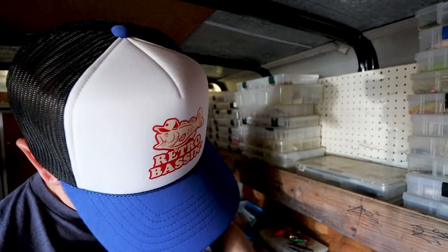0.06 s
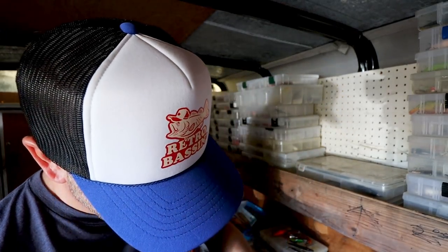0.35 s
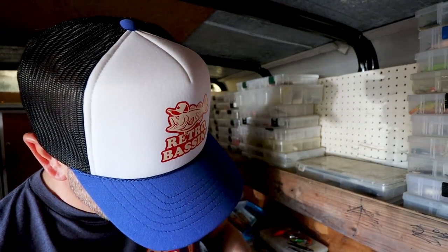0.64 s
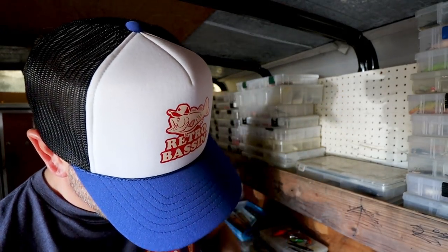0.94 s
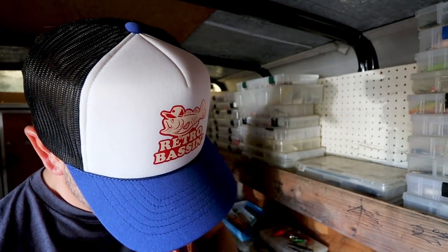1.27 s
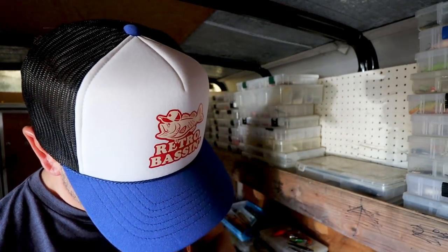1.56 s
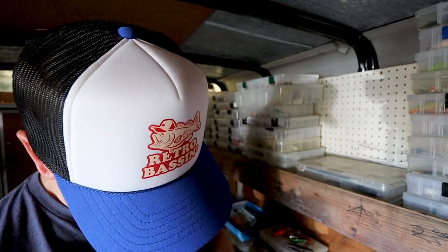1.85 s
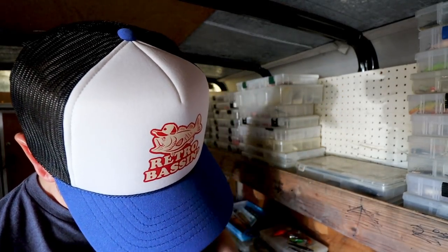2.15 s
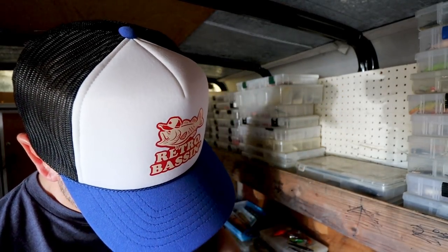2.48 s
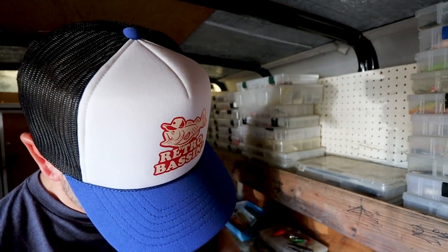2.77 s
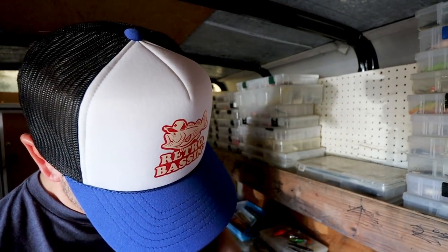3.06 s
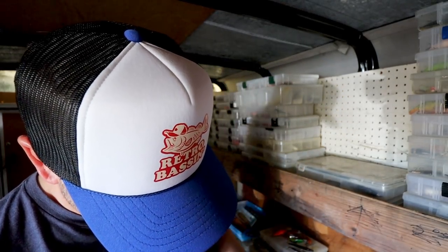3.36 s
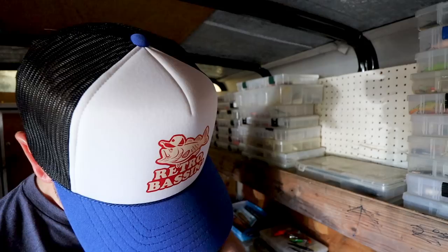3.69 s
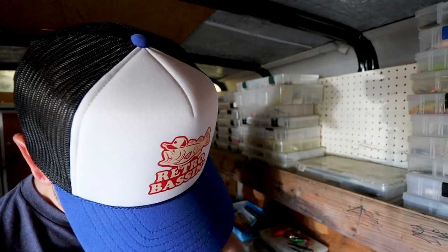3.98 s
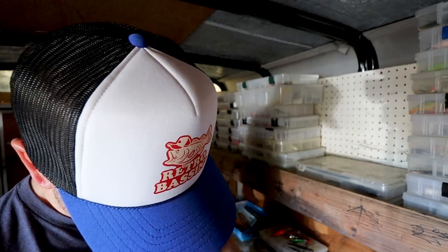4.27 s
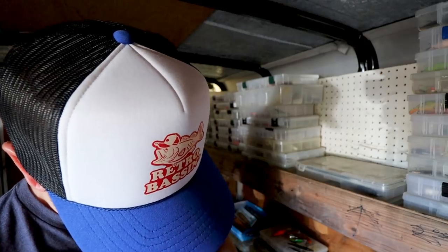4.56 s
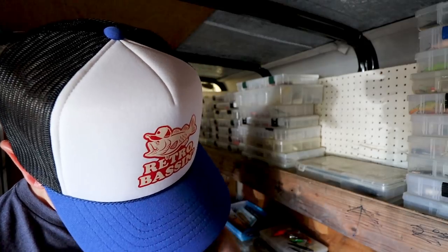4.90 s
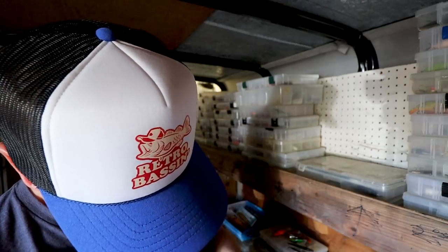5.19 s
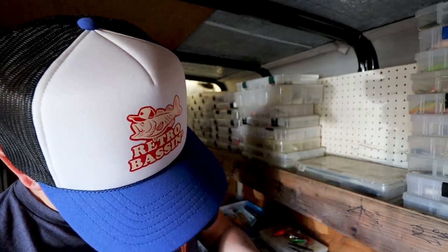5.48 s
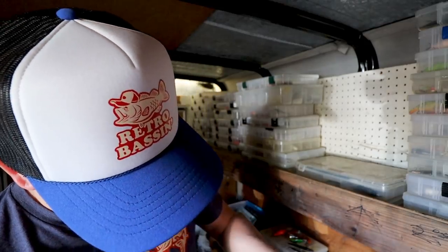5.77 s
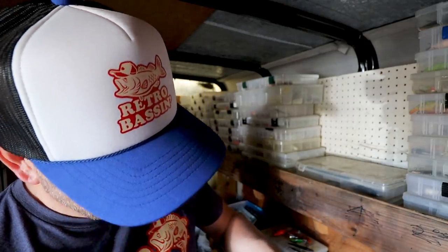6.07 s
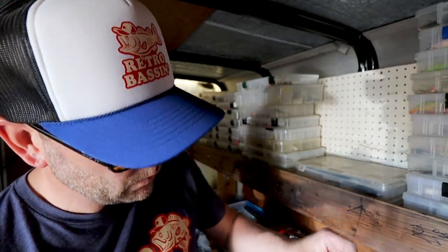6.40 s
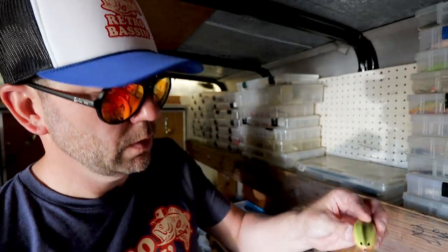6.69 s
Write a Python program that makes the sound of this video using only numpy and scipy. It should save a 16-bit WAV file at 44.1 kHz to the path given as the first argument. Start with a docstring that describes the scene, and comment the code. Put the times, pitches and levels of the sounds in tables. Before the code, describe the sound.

Someone rummages through a tackle box in a small room, hollow lures clacking and hooks clinking above a low hum.

```python
"""Plastic fishing lures clatter as someone rummages through a tackle box in a small workshop.
Each knock thumps the box, clacks a hollow lure and rings its steel hooks. Each push of the hand
sets the heap scraping and tinkling until it settles. Close shelves add a short echo.
Behind it are faint room air and an engine droning outside, its pitch creeping up and dropping back."""
import sys
import numpy as np
from scipy import signal
from scipy.fft import rfft, irfft
from scipy.io import wavfile
from scipy.ndimage import uniform_filter1d

SR = 44100
rng = np.random.default_rng(int(sys.argv[2]) if len(sys.argv) > 2 else 0)


def pcm_store(signal):
    """Save signal as 16-bit PCM."""
    levels = np.round(np.clip(np.atleast_2d(signal), -1, 1) * 32767)
    wavfile.write(sys.argv[1], SR, levels.astype(np.int16).T)


N = 306048
TIME = np.arange(N) / SR
RING_TIME = np.arange(8192) / SR  # seconds since a contact


def gain(db):
    """Turn decibels into a number to multiply by."""
    return 10 ** (np.asarray(db) / 20)


def unit(x):
    """Scale a sound so its total energy is 1."""
    return x / np.sqrt(np.sum(x ** 2) + 1e-18)


def add(track, start_s, sound):
    """Mix a sound into a track at the given time."""
    start = max(int(start_s * SR), 0)
    part = track[start:start + len(sound)]
    part += sound[:len(part)]


def colour(x, points):
    """Shape a sound's lows and highs along a curve of (Hz, dB) points."""
    hz, db = np.transpose(points)
    size = len(x)
    bin_hz = np.arange(size // 2 + 1) * SR / size + 1
    log_gain = np.log(gain(np.interp(np.log(bin_hz), np.log(hz), db)))
    cepstrum = irfft(log_gain, size)
    # folding this in half makes the filter ring after a hit, not before it
    cepstrum[1:size // 2] *= 2
    cepstrum[size // 2 + 1:] = 0
    return irfft(rfft(x) * np.exp(rfft(cepstrum)), size)


def drift(rate_hz):
    """A smooth random wander, roughly between -1 and 1."""
    step = int(SR / rate_hz)
    return uniform_filter1d(np.repeat(rng.standard_normal(N // step + 1), step), step)[:N]


def fade(t60):
    """Die away by 60 dB in t60 seconds, the ring time."""
    return np.exp(-np.log(1000) * RING_TIME / t60)


def burst(t60):
    """A puff of noise that dies away."""
    return rng.standard_normal(len(RING_TIME)) * fade(t60)


# The tone of the room's hush. Each row: frequency in Hz, relative level in dB.
AIR_COLOUR = [(25, -7), (60, -3.5), (130, -6), (210, -3), (320, -10.5), (600, -11), (900, -10),
              (1300, -7.5), (2000, -15), (3000, -23.5), (5000, -31), (9000, -27.5), (15000, -30.5)]


def room_air(level_db=-48.5):
    """Faint room noise that slowly swells and sinks."""
    swell_db = .7 * drift(2.3)
    hush = unit(colour(rng.standard_normal(N), AIR_COLOUR)) * np.sqrt(N)
    return hush * gain(level_db + swell_db)


# How the engine runs. Each row: time in seconds, firings per second (three a turn), level in dB.
ENGINE_RUN = [(0.0, 77, -51), (0.27, 78.4, -43.5), (1.02, 79.1, -43), (2.01, 84.8, -41.5),
              (3.38, 89.6, -40), (3.58, 90.7, -39.5), (3.77, 88.6, -36.5), (3.96, 90.2, -41.5),
              (4.08, 85.1, -52.5), (4.35, 78.6, -47.5), (4.6, 77.6, -55), (4.7, 74, -67), (4.95, 75.7, -53),
              (5.18, 77.7, -61), (5.62, 76.23, -47), (6.94, 78.2, -32.5)]
# The tones of its exhaust. Each row: multiple of the firing rate, relative level in dB.
EXHAUST_TONES = [(1, -0.5), (4 / 3, -18.5), (5 / 3, -16), (3, -22), (7 / 3, -19)]


def engine(waver=0.0052, flutter_db=1.0):
    """An engine outside: only the lowest tones of its exhaust come through the walls."""
    times, rates, levels = np.transpose(ENGINE_RUN)
    firing_hz = np.interp(TIME, times, rates) * (1 + waver * drift(3.87))
    phase = 2 * np.pi * np.cumsum(firing_hz) / SR
    drone = sum(gain(db + flutter_db * drift(12)) * np.sin(multiple * phase)
                for multiple, db in EXHAUST_TONES)
    return np.sqrt(2) * gain(np.interp(TIME, times, levels)) * drone


def workshop_echo(x, echo_db=-4, t60=0.16, delay_s=0.0029):
    """Close shelves and a low roof send back a short, dense echo."""
    tail = colour(burst(t60), [(100, -8.5), (400, 6.5), (2000, 5.5), (8000, 4.5), (16000, 8.5)])
    tail = unit(tail * np.clip(RING_TIME / delay_s - 1, 0, 1))
    echo = signal.oaconvolve(x, tail)[:N]
    return (x + gain(echo_db) * echo) / np.sqrt(1 + gain(2 * echo_db))


def ring(hz, t60, skid_s=0.00052):
    """One fading tone; the contact skids for an instant before the piece rings fully."""
    onset = 1 - np.exp(-RING_TIME / skid_s)
    return unit(np.sin(2 * np.pi * hz * RING_TIME) * fade(t60) * onset)


def struck(tones, spread=0.02):
    """Each blow lands on a new spot of a slightly different piece, so its tones vary in mix and pitch."""
    chance = rng.standard_normal((len(tones), 2))
    return unit(sum(gain(db) * weight * ring(hz * (1 + spread * detune), t60)
                    for (hz, t60, db), (weight, detune) in zip(tones, chance)))


def contact(points, hz, width_hz, lift_db, t60, rise_s):
    """Tiny bounces build up and die away; the struck part boosts the noise near its own pitch."""
    noise = colour(burst(t60) * (1 - np.exp(-RING_TIME / rise_s)), points)
    band = signal.lfilter(*signal.iirpeak(hz, hz / width_hz, fs=SR), noise)
    return unit(unit(noise) + gain(lift_db) * unit(band))


# The tones the box rings with. Each row: pitch in Hz, ring time in seconds, relative level in dB.
BOX_TONES = [(297, 0.23, 5.5), (346.5, 0.073, 9), (480, 0.031, 12.5), (577, 0.045, 9), (660, 0.011, 16)]
# The noise of a hit on the box. Each row: frequency in Hz, relative level in dB.
BOX_COLOUR = [(40, -61), (130, -25), (190, -16), (250, -12.5), (310, -4), (420, -10.5), (520, -5.5),
              (700, -6.5), (1000, -11), (2000, -57.5)]


def box_thump(hz, ring_db=-5):
    """The floor of the box gives under a lure."""
    thud = contact(BOX_COLOUR, hz, width_hz=118, lift_db=4, t60=0.036, rise_s=0.0016)
    return unit(thud + gain(ring_db) * struck(BOX_TONES))


# The tones of the lures and their tray. Each row: pitch in Hz, ring time in seconds, relative dB.
LURE_TONES = [(810, 0.14, -33), (931, 0.022, -3), (1191, 0.039, 3), (1340, 0.085, -3), (1533, 0.16, -14),
              (1970, 0.037, 1.5), (2950, 0.048, -40), (3820, .03, -2.5)]
# The noise of a hit on a lure. Each row: frequency in Hz, relative level in dB.
LURE_COLOUR = [(400, -30.5), (700, -8), (900, 2), (1300, 0), (1700, 0.5), (3000, -2), (4500, -3.5),
               (5500, -6), (7500, -29.5)]


def lure_clack(hz, force_db=0):
    """A hollow plastic body rings briefly; the lighter the tap, the more its main tone stands out."""
    tone_weight = np.clip((-29 - force_db) / 5, .35, 1.3)
    crack = contact(LURE_COLOUR, hz, width_hz=360, lift_db=-1, t60=0.022, rise_s=0.002)
    return unit(crack + gain(-9) * struck(LURE_TONES) + tone_weight * ring(hz, t60=0.021))


# The tones of hooks and split rings. Each row: pitch in Hz, ring time in seconds, relative level in dB.
HOOK_TONES = [(6000, 0.037, 17), (7600, 0.043, 15), (8600, 0.059, 20), (9700, 0.026, -6),
              (10100, 0.099, 15), (10200, 0.14, 2), (12800, 0.056, 10)]
# The noise of a hit on a hook. Each row: frequency in Hz, relative level in dB.
HOOK_COLOUR = [(4000, -12), (5600, -5.5), (7000, -3), (8700, -1), (10200, -5), (11300, -9.5), (13400, -7),
               (15000, -13), (16500, -18)]


def hook_clink(hz, ring_db=-12, prong_db=-5, chatter_db=-2, free_db=-3, free_hz=9950):
    """A steel hook pings, chatters and shakes its split ring; those near free_hz hang free and ring on."""
    ping = contact(HOOK_COLOUR, hz, width_hz=760, lift_db=-15, t60=0.021, rise_s=0.0022)
    prong = gain(prong_db) * ring(hz, t60=0.0083)
    freedom = np.exp(-((hz - free_hz) / 290) ** 2)
    free_ring = gain(free_db) * freedom * ring(hz, t60=0.066)
    chatter = gain(chatter_db) * hook_chatter(hz)
    return unit(ping + prong + free_ring + chatter + gain(ring_db) * struck(HOOK_TONES))


def hook_chatter(hz, gap_s=.003, t60=0.009, count=6):
    """A hook bounces on its neighbours: quick, weakening pings, every third at its own pitch."""
    out = np.zeros(len(RING_TIME))
    starts = np.cumsum(rng.exponential(gap_s, count))
    pitches = rng.uniform(5500, 15000, count)
    for k, (start_s, prong_hz) in enumerate(zip(starts, pitches)):
        add(out, start_s, 0.8 ** k * ring(hz if k % 3 == 0 else prong_hz, t60))
    return unit(colour(out, HOOK_COLOUR))


def rattle(piece, low_hz, high_hz, per_second, scatter_db, count=48):
    """A steady stream of tiny random hits, shared among loose pieces of different pitch."""
    out = np.zeros(N)
    sounds = [piece(hz) for hz in np.geomspace(low_hz, high_hz, count)]
    for when, force, which in rng.random((int(per_second * N / SR), 3)):
        add(out, when * N / SR, gain(scatter_db * force) * sounds[int(which * count)])
    return unit(out) * np.sqrt(N)


# The hand pushing through the heap.
# Each row: start in seconds, length in seconds, scraping level in dB, tinkling level in dB.
HAND_PUSHES = [(0, 0.33, -56, -39.5), (1.016, 0.2, -67, -42.5), (1.477, 0.64, -44.5, -37),
               (2.456, 0.24, -39.5, -41), (2.79, 0.59, -48, -37), (3.562, 0.11, -41.5, -47),
               (3.798, 0.036, -49, -56.5), (4.449, 0.063, -32, -29.5), (4.628, 0.13, -55, -35.5),
               (4.949, 0.12, -34.5, -31.5), (5.391, 0.078, -71, -35.5), (6.051, 0.15, -72, -47.5),
               (6.697, .11, -60, -42.5)]


def heap_motion(rest_scrape_db=-58.5, rest_tinkle_db=-58, rise_s=0.046, settle_t60=0.38, jolt_t60=0.19):
    """How hard the heap scrapes and tinkles: resting fingers, pushes and knocks add their power."""
    scrape = np.full(N, gain(rest_scrape_db) ** 2)
    tinkle = np.full(N, gain(rest_tinkle_db) ** 2)
    for start_s, length_s, scrape_db, tinkle_db in HAND_PUSHES:
        before = np.maximum(start_s - TIME, 0)
        after = np.maximum(TIME - start_s - length_s, 0)
        push = np.exp(-before / rise_s - np.log(1000) * after / settle_t60)  # builds, holds, settles
        scrape += (gain(scrape_db) * push) ** 2
        tinkle += (gain(tinkle_db) * push) ** 2
    # each knock (listed below) jolts its neighbours into a quieter rattle
    for start_s, _, _, lure_db, _, hook_db, _ in LURE_KNOCKS:
        add(scrape, start_s, (gain(lure_db - 14) * fade(jolt_t60)) ** 2)
        add(tinkle, start_s, (gain(hook_db - 6) * fade(jolt_t60)) ** 2)
    return np.sqrt(scrape), np.sqrt(tinkle)


def stirring(rub_db=-8, soften_hz=11500):
    """Lures scrape on each other and rub on the box while their hooks tinkle."""
    scrape_gain, tinkle_gain = heap_motion()
    scrape = rattle(lure_clack, 1000, 4200, per_second=330, scatter_db=16)
    rub = rattle(box_thump, 300, 600, per_second=120, scatter_db=12)
    tinkle = rattle(hook_clink, 6200, 10200, per_second=130, scatter_db=28)
    # gentle touches hardly reach the highest rings
    tinkle = signal.lfilter(*signal.butter(1, soften_hz, fs=SR), tinkle)
    return scrape_gain * (scrape + gain(rub_db) * rub) + tinkle_gain * tinkle


# Hooks touching only each other. Each row: start in seconds, level in dB, main pitch in Hz.
LOOSE_CLINKS = [(.073, -23.5, 9880), (.14, -27.5, 9880), (.253, -31.5, 10100), (0.366, -26.5, 9950),
                (.776, -34, 5800), (.796, -45, 6040), (1.041, -24.5, 9200), (1.463, -36, 7040),
                (1.903, -25.5, 9040), (2.109, -17.5, 10080), (2.509, -13, 10100), (3.211, -30, 9600),
                (4.089, -43.5, 6900), (4.193, -41.5, 6720), (4.689, -21, 9890), (5.055, -22.5, 9980),
                (5.088, -24, 7570), (5.326, -36.5, 8600), (5.402, -30.5, 6400), (5.427, -27, 6460),
                (5.466, -28.5, 6300), (5.517, -29.5, 5190), (5.595, -40.5, 8670), (5.675, -36.5, 5120),
                (5.761, -32, 11970), (6.067, -43, 8030), (6.19, -37.5, 9000), (6.745, -40.5, 6870)]
# Lures knocking about. Each row: start in seconds, then a level in dB and a main pitch in Hz
# for the box's thump, for the lure's clack and for the hook's clink.
LURE_KNOCKS = [(.003, -25, 440, -25.5, 1110, -39, 7600), (.022, -45, 326, -27.5, 1010, -36, 9100),
               (0.039, -38, 358, -28.5, 2450, -33, 5970), (0.083, -24.5, 524, -22, 1440, -26, 9930),
               (0.167, -40, 302, -31, 2280, -46, 9700), (0.283, -38.5, 570, -29, 1170, -34, 5850),
               (.323, -37.5, 453, -31.5, 1120, -27.5, 5700), (.359, -46, 300, -32.5, 1220, -31, 8600),
               (0.397, -36.5, 300, -27, 2060, -59, 5250), (0.9, -34, 306, -26, 2010, -37.5, 7150),
               (.964, -40, 250, -29.5, 1380, -60, 5000), (1.004, -40, 295, -29, 1460, -35, 7500),
               (1.087, -21.5, 320, -15, 1340, -23, 9000), (1.096, -15, 315, -13.5, 2000, -15.5, 8830),
               (1.133, -47, 500, -18, 3640, -21, 7800), (1.155, -31, 312, -20, 2200, -27.5, 8050),
               (1.291, -37, 454, -31, 4310, -33, 8600), (1.569, -22, 596, -24, 1450, -43, 7800),
               (1.586, -24.5, 347, -20, 810, -22, 7130), (1.694, -41, 604, -27, 4140, -25.5, 9000),
               (1.718, -43, 580, -25.5, 2970, -27.5, 9100), (1.756, -19, 660, -13.5, 1040, -22.5, 5000),
               (1.774, -25, 700, -19.5, 1500, -29, 7490), (1.948, -32.5, 655, -28.5, 2940, -49, 5060),
               (1.983, -39, 480, -28, 1170, -27, 9560), (2.021, -23, 326, -14.5, 1000, -15.5, 7020),
               (2.059, -21, 480, -21.5, 810, -39, 7850), (2.097, -38, 560, -34, 810, -30, 7300),
               (2.202, -48, 530, -28.5, 4660, -24.5, 6850), (2.345, -31, 554, -23.5, 1070, -30.5, 6950),
               (2.38, -25.5, 580, -24, 2380, -30.5, 6750), (2.401, -16, 325, -20, 810, -27, 7940),
               (2.459, -29, 466, -20.5, 1670, -22.5, 9700), (2.478, -23, 328, -19.5, 1970, -19.5, 10200),
               (2.502, -16.5, 367, -9.5, 3470, -15, 8700), (2.528, -30, 320, -17, 1950, -28, 8800),
               (2.594, -32.5, 570, -30.5, 1870, -43, 7420), (2.659, -39.5, 580, -31.5, 1990, -56, 8780),
               (2.775, -34, 715, -27, 1290, -36, 5000), (2.796, -40, 699, -28.5, 1355, -32.5, 7100),
               (2.844, -25.5, 660, -25, 810, -26, 9000), (2.854, -36, 556, -21, 1700, -23, 8640),
               (3.007, -41, 310, -30, 1220, -48, 8110), (3.068, -20.5, 215, -15.5, 1430, -19.5, 9100),
               (3.153, -39, 190, -34.5, 1660, -44, 8550), (3.298, -35, 460, -28.5, 1070, -30.5, 12800),
               (3.339, -39, 540, -30.5, 1970, -50, 8600), (3.613, -34.5, 496, -35, 1330, -46, 8840),
               (3.712, -37, 618, -30.5, 1190, -45, 7700), (4.238, -42, 674, -36.5, 880, -47, 8750),
               (4.39, -35, 462, -33.5, 3350, -24, 7470), (4.413, -39, 696, -38, 4530, -30.5, 8900),
               (4.446, -27, 313, -25, 975, -19, 9900), (4.474, -19, 563, -13, 1240, -21, 13800),
               (4.491, -36, 690, -25, 1140, -21, 13400), (4.503, -25.5, 715, -14, 1250, -19.5, 10200),
               (4.531, -23, 595, -28, 1270, -16, 9970), (4.588, -35, 637, -24, 3140, -11.5, 5530),
               (4.598, -26.5, 322, -11.5, 2900, -17, 9900), (4.613, -31, 314, -19, 2950, -19.5, 10000),
               (4.669, -63, 697, -28, 3100, -23, 8570), (4.856, -32.5, 597, -23.5, 3350, -23, 9200),
               (4.871, -35, 596, -14.5, 3130, -25.5, 5800), (4.882, -21, 615, -15.5, 3800, -15, 7660),
               (4.917, -17, 220, -13.5, 4040, -14.5, 9900), (4.938, -16.5, 480, -19.5, 810, -14, 10320),
               (4.949, -31, 320, -24, 1230, -18, 7300), (5.011, -27.5, 695, -25.5, 4340, -18.5, 9780),
               (6.701, -63, 198, -38, 2537, -46, 8660), (6.876, -42, 190, -34.5, 1315, -60, 5430)]


def knocks(rebound_s=.007, rebound_db=-7.5, hook_lag_s=.0012, bass_cut_hz=125):
    """Lures hit the box and each other and bounce once; their hooks swing in, and loose ones clink."""
    out = np.zeros(N)
    gaps = rebound_s * rng.uniform(.5, 1.5, len(LURE_KNOCKS))
    share = 1 / np.sqrt(1 + gain(2 * rebound_db))  # hit and bounce split the clack's energy
    for (start_s, box_db, box_hz, lure_db, lure_hz, hook_db, hook_hz), gap in zip(LURE_KNOCKS, gaps):
        add(out, start_s, gain(box_db) * box_thump(box_hz))
        add(out, start_s, share * gain(lure_db) * lure_clack(lure_hz, lure_db))
        add(out, start_s + gap, share * gain(lure_db + rebound_db) * lure_clack(lure_hz, lure_db))
        add(out, start_s + hook_lag_s, gain(hook_db) * hook_clink(hook_hz))
    for start_s, db, hz in LOOSE_CLINKS:
        add(out, start_s, gain(db) * hook_clink(hz))
    # things this small give off little bass
    out = signal.lfilter(*signal.butter(2, bass_cut_hz, "high", fs=SR), out)
    return out * np.sqrt(SR / 100)  # a hit's level is its energy spread over 10 ms


def scene():
    """The tackle box in its room, over the engine and the air, in one channel."""
    return (workshop_echo(knocks() + stirring()) + engine() + room_air())[None]


def record(dry, top_hz=16000):
    """Clip any peak beyond full scale, then cut the highest treble."""
    treble_cut = signal.ellip(10, .2, 85, top_hz, fs=SR, output="sos")
    return signal.sosfilt(treble_cut, np.clip(dry, -1, 1))


dry = scene()
out = record(dry)
pcm_store(out)
```